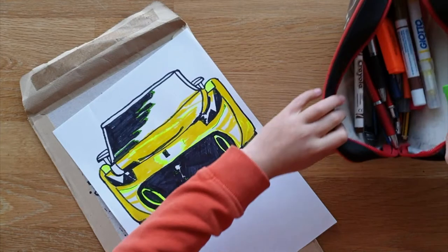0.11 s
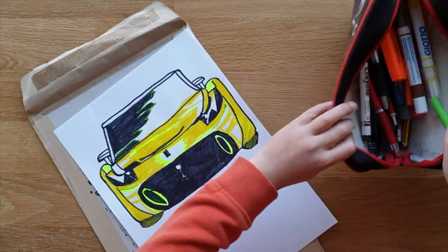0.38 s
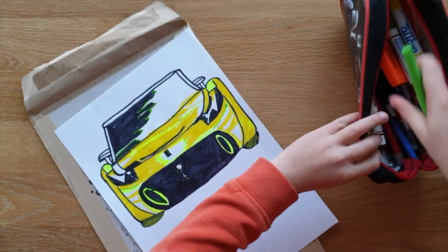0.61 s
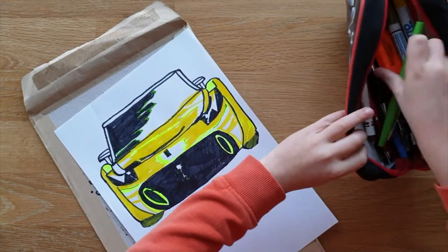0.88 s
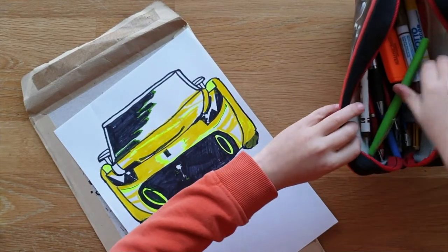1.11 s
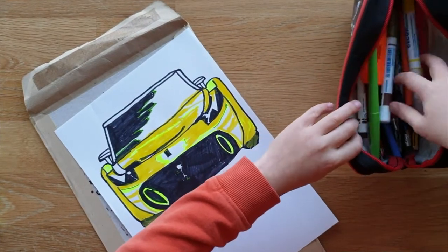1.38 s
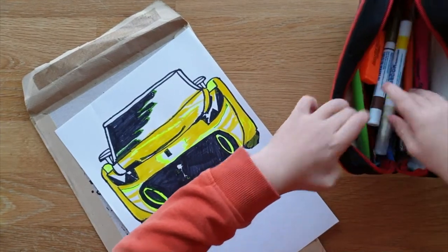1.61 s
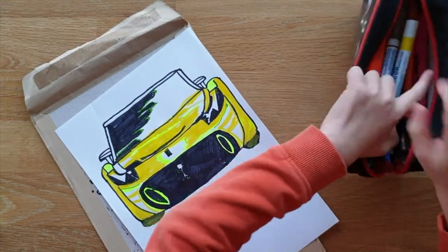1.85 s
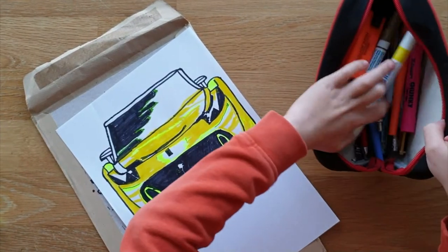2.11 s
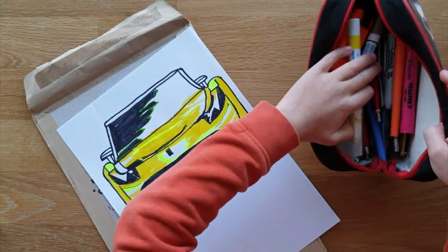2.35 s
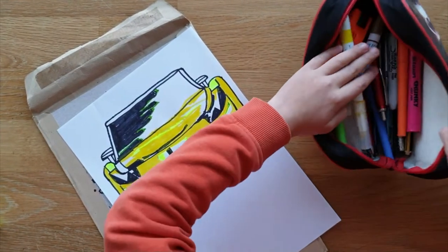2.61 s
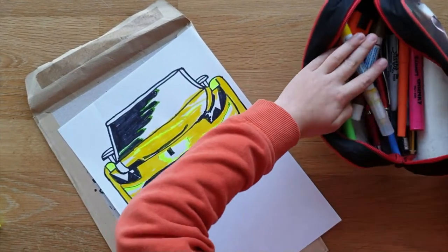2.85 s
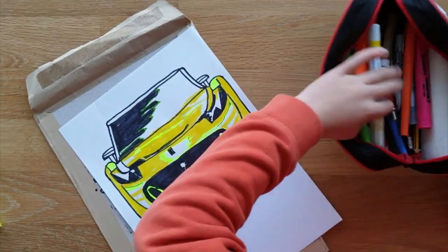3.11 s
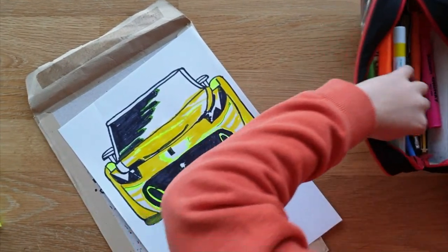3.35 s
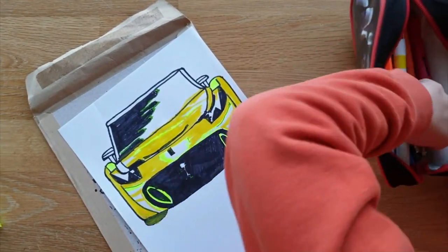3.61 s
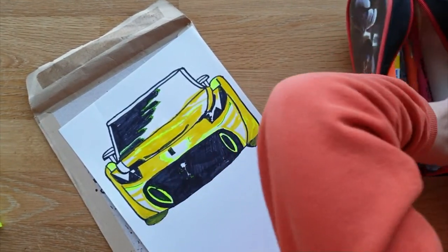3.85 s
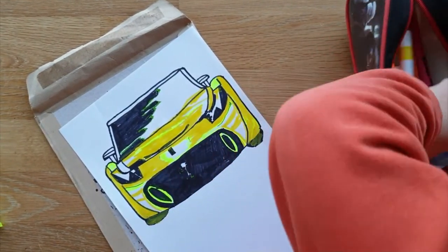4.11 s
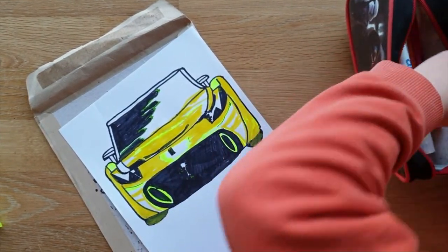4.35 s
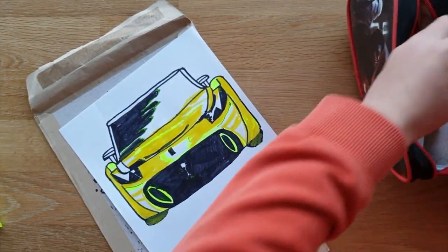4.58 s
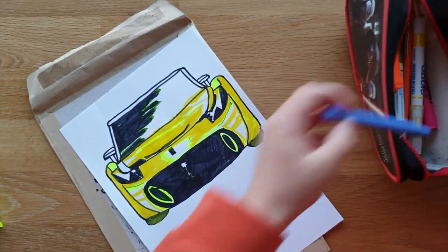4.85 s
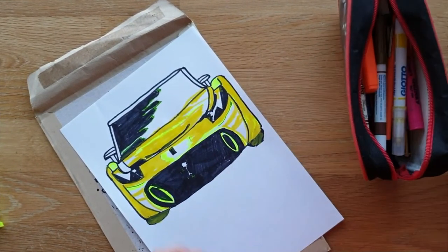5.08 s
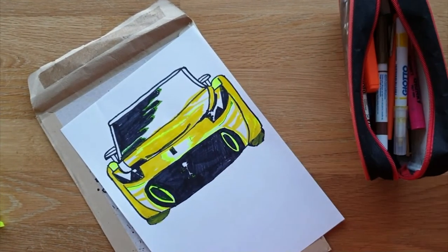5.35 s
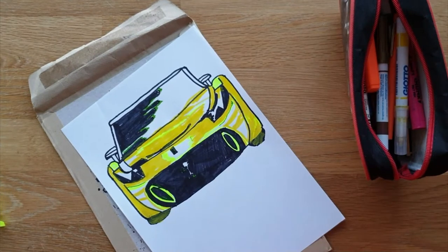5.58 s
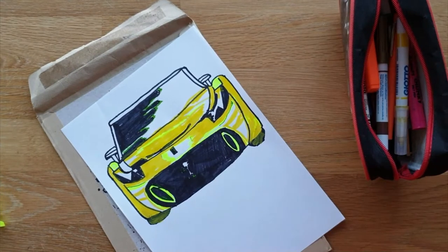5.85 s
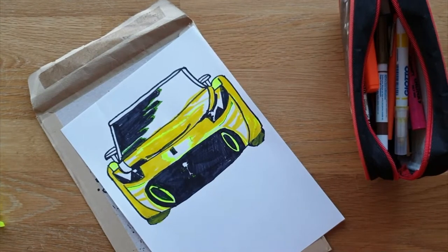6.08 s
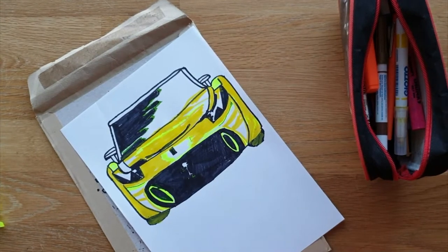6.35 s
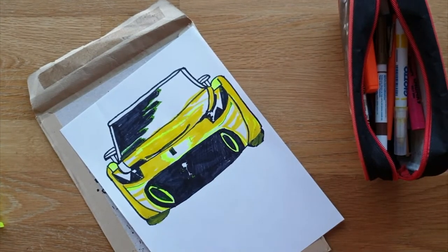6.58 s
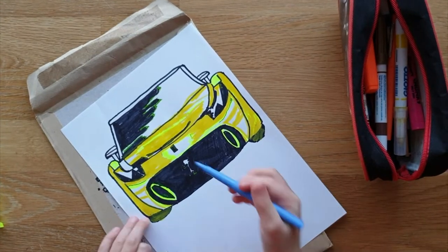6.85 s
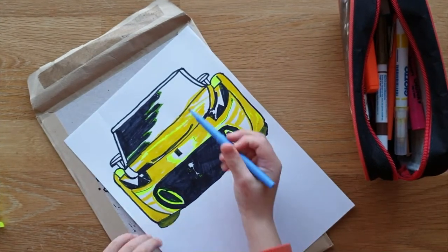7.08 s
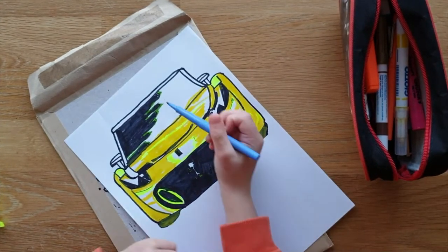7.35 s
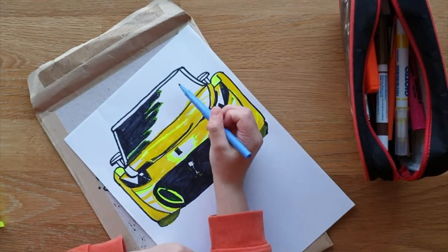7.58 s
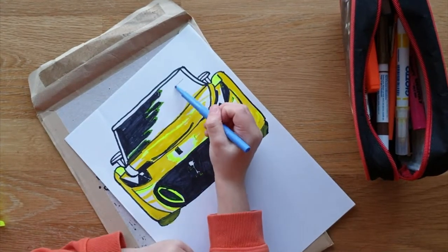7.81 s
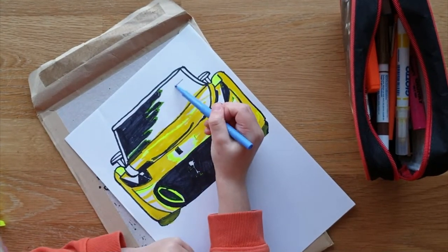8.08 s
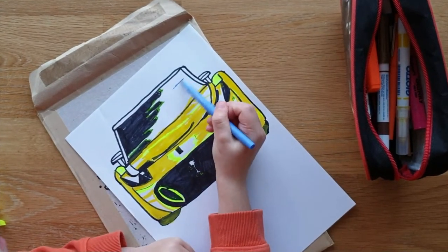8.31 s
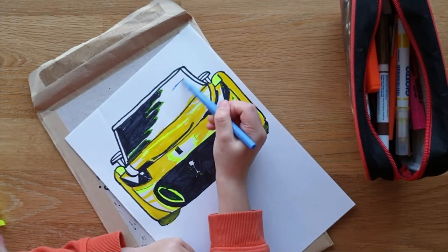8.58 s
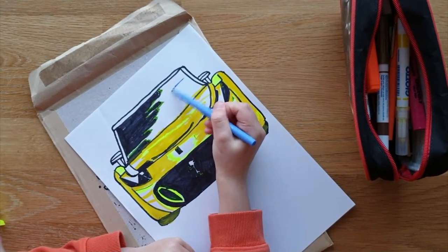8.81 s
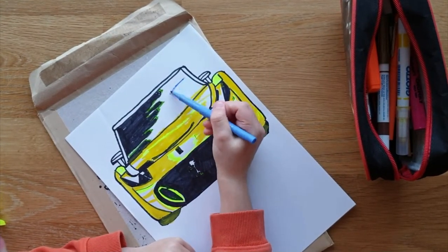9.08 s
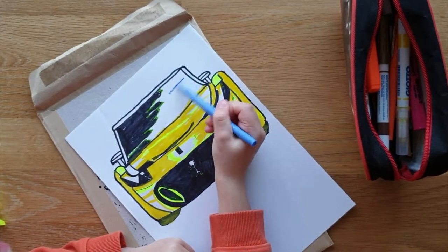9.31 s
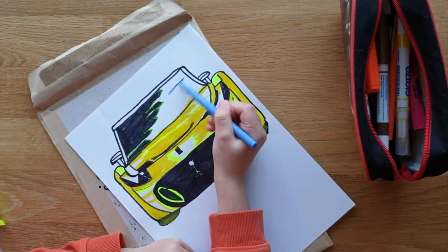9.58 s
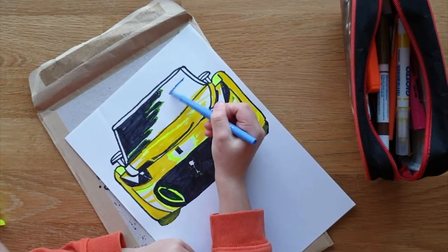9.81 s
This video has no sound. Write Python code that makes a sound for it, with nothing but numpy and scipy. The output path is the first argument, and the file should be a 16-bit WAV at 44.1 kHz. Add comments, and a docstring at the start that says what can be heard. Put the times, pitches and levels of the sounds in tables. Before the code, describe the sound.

A stereo pair close overhead hears sharp pen clacks and gritty cloth rustle from a pencil case, stronger on the left, with the table dragging and rumbling. The rummaging stops, a brief breathy cap slide drops in pitch, light plastic clicks and dull knocks follow, then soft thuds and steady, dry felt-tip scratching back and forth. A faint room hush lies beneath.

```python
"""Plastic pens clack as a hand rummages in a cloth case on a wooden table: noise cracks ring barrel modes.
Gritty noise makes the rustle of cloth and sleeve, the scrape of the table top and the felt tip's quick strokes.
A cap comes off as gliding narrow noise; thuds are low decaying sines, far knocks mostly room tail.
The table rumbles on its legs and a steady hush lies beneath; a bare room answers.
Two microphones a few centimetres apart listen from above, the left one louder and nearer the case."""
import sys
import numpy as np
from scipy import signal
from scipy.fft import rfft, irfft, next_fast_len
from scipy.io import wavfile
from scipy.ndimage import map_coordinates

SR = 44100
rng = np.random.default_rng(int(sys.argv[2]) if len(sys.argv) > 2 else 0)


def nominal_scale(level):
    """Amplitude ratio for a level in decibels (scalar or array-like)."""
    x = np.asarray(level, float) / 20
    return 10 ** x


def put_to_file(sound):
    """Save the sound as 16-bit audio at rate SR, in the file named by the first command-line argument."""
    columns = np.atleast_2d(sound).T  # one column per channel
    safe = np.clip(columns, -1, 1)
    whole_steps = np.round(safe * 32767)
    wavfile.write(sys.argv[1], SR, whole_steps.astype(np.int16))


N = 438340

# pen against pen: (time [s], relative level [dB], knock [dB], treble [dB], favoured pitch [Hz])
CLACKS = [(0.0054, -32, -6, -15, 1920), (0.061, -41, -14, -12, 5320), (0.0707, -33.5, -9, 7.5, 2050),
          (0.5156, -38.5, -30, 4.5, 9700), (0.6493, -42.5, -4, -11, 2350), (0.7096, -9.5, -14, 6, 6630),
          (0.7242, -16.5, -12, -19, 6890), (0.7435, -17.5, -8.5, -7, 6610), (0.8835, -29, -29, 2, 7040),
          (0.9552, -19.5, -10, -11, 1404), (1.0092, -43, -17, -8, 1860), (1.044, -31, -25, -3, 7350),
          (1.051, -28, -11, -15, 4680), (1.1179, -28, -11, -8, 4900), (1.2046, -24.5, -8, -1, 7030),
          (1.219, -14, -18, -11, 5140), (1.242, -21.5, -6, 4.5, 4540), (1.31, -30.5, -23, -1, 6600),
          (1.3284, -29, -9, 1.5, 6620), (1.413, -31.5, -13, -20, 1380), (1.4271, -24, -8, -5, 1720),
          (1.5034, -20, -8, -0.5, 6800), (1.7956, -25.5, -10, -11, 5130), (1.871, -28, -9, 0, 4110),
          (1.9057, -33, 4, -14, 2580), (1.919, -23.5, -5, -9, 1710), (1.938, -15.5, -8.5, -1, 3760),
          (2.032, -27.5, -23, 2, 6650), (2.0684, -29, -17, -3, 7170), (2.116, -8, -19, -2, 6800),
          (2.189, -27, -10, -1, 6300), (2.1919, -21, -7, -4, 7150), (2.2224, -28.5, -2, -2, 4620),
          (2.2326, -18.5, -18, -1, 6760), (2.243, -18, -4.5, -23, 7010), (2.3094, -14.5, -14, -15, 4200),
          (3.0878, -26, -7, -4, 6867), (3.105, -25.5, -11, -17, 3330), (3.4498, -31.5, -1, 1.5, 6700),
          (3.59, -30.5, -4, -5, 2230), (3.679, -36.5, 4, -10, 1030), (3.7239, -7.5, -14.5, -6.5, 3240),
          (4.056, -34, -5, -8, 6900), (4.085, -36, -2, 5.5, 6200), (4.139, -20.5, -31, -4, 6690),
          (4.145, -26, -12, -13, 4080), (4.2914, -19, -14, -6.5, 6020), (4.449, -20, -7, -3, 2190),
          (4.4726, -17.5, -8.5, -7, 2130), (4.5007, -18, -5.5, 0, 7160), (6.217, -52, -5, -5, 1570),
          (6.2688, -31, -15, 0.5, 7230), (6.2938, -27.5, -10, -4.5, 2200), (6.3204, -43, -16, -15, 6750),
          (6.3327, -35, -5, 4.5, 1580), (7.525, -34.5, -6, -29, 1590)]
# hand, case and arm: (time [s], hold [s], relative rustle [dB], crispness re rustle [dB], relative scrape [dB])
MOVES = [(0.0, 0.0093, -47.5, -3.5, -53), (0.439, 0.05, -54, -5, -65), (.67, .03, -57.5, -7, -60),
         (0.908, 0.37, -56, 3, -60), (1.264, 0.038, -50, -6, -50), (1.498, 0.14, -48.5, -15, -56),
         (1.834, 0.19, -47, -8, -63), (1.97, 0.045, -44.5, 2.5, -49.5), (2.202, 0.074, -58, 1, -48.5),
         (2.504, .45, -54, -11.5, -66), (3.086, 0.24, -47, -12.5, -46), (3.366, 0.4, -50, -7, -51.5),
         (3.771, 0.099, -45, -4, -60), (4.121, 0.13, -46, -10, -59), (4.517, 0.016, -44.5, 1, -48),
         (4.862, .2, -48, -12.5, -49.5), (5.387, 0.095, -61.5, -7, -74), (5.731, 0.076, -54, -9.5, -74),
         (6.335, 0.032, -51.5, -9, -84), (6.671, 0.14, -48.5, -9.5, -53), (6.898, 0.14, -58.5, -1, -60),
         (7.097, 0.091, -50.5, -11, -51), (7.341, 0.073, -55.5, -27, -54), (7.546, 0.15, -55, -22, -61.5),
         (7.786, 0.041, -46, -6, -53), (7.978, 0.13, -52.5, -13, -56), (8.188, 0.047, -53, -9, -54),
         (8.398, 0.19, -62.5, -3, -68), (8.797, 0.035, -67, -7, -62.5), (9.001, 0.056, -70.5, 0, -62.5),
         (9.84, .1, -57.5, -2.5, -58.5)]
# strength at rest: (rustle [dB], crisp rustle [dB], scrape [dB], rumble [dB]), all relative
RESTING_DB = -72.5, -85.5, -72.5, -76.5
LAG_SAMPLES = 10  # right microphone hears the case later


def unit(x):
    """Scales to rms 1."""
    return x / np.sqrt(np.mean(x ** 2) + 1e-20)


def along(points, hz):
    """Interpolates (Hz, value) points on a log axis."""
    f, v = np.transpose(points)
    return np.interp(np.log(hz + 1), np.log(f + 1), v)


def curves(rows):
    """One value per sample for each column after the time."""
    s, *columns = np.transpose(rows)
    return [np.interp(np.arange(N) / SR, s, column) for column in columns]


def wobble(knots_per_s):
    """Smooth random curve through normal knots."""
    knots = rng.standard_normal(int(N * knots_per_s / SR) + 4)
    return map_coordinates(knots, [np.arange(N) * knots_per_s / SR])


def filtered(x, response):
    """Multiplies the spectrum of x by a function of frequency."""
    size = next_fast_len(x.shape[-1] + 8192)
    spectrum = rfft(x, size) * response(np.fft.rfftfreq(size, 1 / SR))
    return irfft(spectrum, size)[..., :x.shape[-1]]


def coloured(x, spectrum):
    """Shapes x by (Hz, dB) points, rms 1."""
    return unit(filtered(x, lambda hz: nominal_scale(along(spectrum, hz))))


def resonant(x, peaks):
    """Parallel resonances (Hz, width Hz, dB) of alternating sign, rms 1."""
    def response(f):
        total = 0
        for k, (centre, width, db) in enumerate(peaks):
            damping = 1j * f * width
            total = total + (-1) ** k * nominal_scale(db) * damping / (centre * centre - f * f + damping)
        return total
    return unit(filtered(x, response))


def gritty(knots_per_s, grit_db):
    """Friction noise whose strength wanders at random."""
    return rng.standard_normal(N) * nominal_scale(grit_db * wobble(knots_per_s))


def diffuse(n):
    """Two noises, alike in the bass and unrelated in the treble."""
    # (frequency [Hz], left-right correlation [1])
    alike = [(60, 1), (300, 0.37), (650, 0), (1400, 0), (15000, 0)]

    def angle(hz):
        return np.arccos(np.clip(along(alike, hz), -1, 1)) / 2

    noise = rng.standard_normal((2, n))
    mid, side = filtered(noise, lambda hz: np.array([np.cos(angle(hz)), np.sin(angle(hz))]))
    return np.array([mid + side, mid - side])


def heard(x, direct_pan_db, wet_db, lag_samples):
    """Direct sound, first echoes and a tail in which each frequency dies at its own speed."""
    # (frequency [Hz], t60 [s])
    decay = [(300, 0.2), (2000, 0.59), (6000, 0.41), (15000, 0.2)]
    # first echoes: (delay [s], relative level [dB])
    walls = [(.0065, -14), (0.0104, -8.5), (0.0183, -14.5)]
    n = SR // 2
    hz, t, z = signal.stft(diffuse(n), SR, nperseg=256)
    fading = z * nominal_scale(-60 * t / along(decay, hz)[:, None])
    tail = signal.istft(fading, SR, nperseg=256)[1][:, :n]
    onset = 1 - np.exp(-np.arange(n) / SR / 0.00074)
    answer = nominal_scale(wet_db) * tail / np.linalg.norm(tail[0]) * onset
    for s, db in walls:
        answer[[0, 1], round(s * SR) + rng.integers(0, 12, 2)] += nominal_scale(db)
    answer[0, 0] += nominal_scale(direct_pan_db / 2)
    answer[1, lag_samples] += nominal_scale(-direct_pan_db / 2)
    return signal.fftconvolve(x[None], answer * nominal_scale([[2], [-2]]), axes=1)  # left 4 dB up, room included


def heard_long(x, *place, size=8192):
    """A lasting sound in overlapping pieces, each with a freshly drawn answer, so no fixed stripes build up."""
    out, fade = np.zeros((2, N + SR + 2 * size)), np.hanning(size)
    x = np.pad(x, size)
    for i in range(0, N + size, size // 2):
        sound = heard(x[i:i + size] * fade, *place)
        out[:, i:i + sound.shape[1]] += sound
    return out[:, size:size + N]


def swells(s, hold_s, db, rise_db_per_s, fall_db_per_s, rest_db):
    """Strength per sample of events with steady dB slopes, power-summed over a resting level."""
    t = np.arange(0, N + 128, 128)[:, None] / SR
    rise_loss = rise_db_per_s * np.clip(s - t, 0, None)
    fall_loss = fall_db_per_s * np.clip(t - s - hold_s, 0, None)
    power = (nominal_scale(db - (rise_loss + fall_loss)) ** 2).sum(1) + nominal_scale(rest_db) ** 2
    return np.interp(np.arange(N) / SR, t[:, 0], np.sqrt(power))


def settling(share_db):
    """Loose pens shuffle on briefly after each clack, more after a loud one."""
    s, clack_db = np.transpose(CLACKS)[:2]
    return swells(s, 0, -35.5 + 0.5 * clack_db + share_db, 1500, 187, -120)


def moving(db, rest_db):
    """Strength of one layer under the movements."""
    s, hold_s = np.transpose(MOVES)[:2]
    return swells(s, hold_s, db, 167, 136, rest_db)


def rummage():
    """Cloth, skin and loose pens rub in small slips; the harder the rubbing, the grittier."""
    # cloth rustle: (frequency [Hz], relative level [dB])
    cloth = [(530, -13.5), (900, -1), (961, -10.5), (1030, -3.5), (2060, -0.5), (2240, -1), (3430, -8),
             (7090, -7), (8300, -19), (10800, -30), (18300, -120)]
    # crisp rustle: (frequency [Hz], relative level [dB])
    crisp_colour = [(4880, -15), (8300, -17.5), (11100, -6.5), (13900, -13.5), (15800, -7.5)]
    rustle_db, crisp_db = np.transpose(MOVES)[2:4]
    rustle = np.hypot(moving(rustle_db, RESTING_DB[0]), settling(0))
    crisp = np.hypot(moving(rustle_db + crisp_db, RESTING_DB[1]), settling(1))
    grit_db = np.clip((20 * np.log10(rustle) + 68) / 7, 0, 4)
    slips = gritty(250, grit_db)
    return rustle * coloured(slips, cloth) + crisp * coloured(slips, crisp_colour)


def table():
    """Dragging excites the top's resonances; heavy drags favour its main mode."""
    # table top resonances: (centre [Hz], width [Hz], relative level [dB])
    top = [(210, 30, -9), (333, 58, -8.5), (417.3, 24.8, 0.5), (610, 79, -5), (713, 59, -2.5),
           (914, 260, -10.5)]
    scrape = np.hypot(moving(np.transpose(MOVES)[4], RESTING_DB[2]), settling(-14))
    heaviness = (scrape / nominal_scale(-43.5)) ** 0.66
    drag = resonant(gritty(40, grit_db=1.0), top)
    main_mode = resonant(gritty(40, grit_db=2.0), [(414.5, 62, 0)])
    return scrape * (drag + heaviness * main_mode)


def legs():
    """Shoves and drags rock the table on its legs: low resonances, 3 dB stronger on the right."""
    # shoves: (time [s], relative level [dB])
    shoves = [(.4, -64), (1.27, -51.5), (1.52, -65), (2.27, -60), (3.2, -63), (3.87, -64), (4.49, -53.5),
              (4.869, -65), (5.402, -58), (6.97, -59.5), (7.64, -47), (7.97, -62)]
    # leg resonances: (centre [Hz], width [Hz], relative level [dB])
    leg_modes = [(49.3, 3.8, 0.3), (84.6, 12, -2.08), (124, 25, -0.98)]
    s, db = np.transpose(shoves)
    rocking = swells(s, 0.013, db, 204, 133, RESTING_DB[3])
    dragging = np.hypot(moving(np.transpose(MOVES)[4] - 31, -120), settling(-29))
    shake = filtered(diffuse(N), lambda f: 1 / (1 + (f / 160) ** 4))
    return np.hypot(rocking, dragging) * resonant(shake, leg_modes) * nominal_scale([[-1.5], [1.5]])


def hush():
    """Steady diffuse noise of the room, 3 dB stronger on the left."""
    # (frequency [Hz], relative level [dB])
    hush_colour = [(30, -7.5), (55, -8), (86, 1.5), (170, -15.5), (310, -6), (700, -8), (1200, -13),
                   (3500, -39), (6800, -9.5), (8400, -30), (13000, -27), (15800, -19.5)]
    return nominal_scale(-64) * coloured(diffuse(N), hush_colour) * nominal_scale([[1.5], [-1.5]])


def clacks():
    """Each contact is a push and broad crack ringing the barrel modes, most those near its own pitch."""
    # hollow pen barrels: (nominal frequency [Hz], relative level [dB], t60 [s])
    barrel = [(1380, 0, .012), (1700, 0, .012), (2200, -2, .007), (2700, -3, .005), (3300, -3, .004),
              (4200, -2, .004), (5100, -2, .004), (6000, -2, .004), (7000, 0, .005), (11000, 0, .003),
              (13200, 0, .003)]
    out, t = np.zeros((2, N + SR)), np.arange(1024) / SR
    hz, level_db, t60_s = np.transpose(barrel)[:, :, None]
    for s, db, knock_db, treble_db, note_hz in CLACKS:
        colour = [(400, -42), (1100, knock_db), (1900, knock_db), (3800, -3.0), (7600, 1.0),
                  (8600, treble_db), (15000, treble_db)]
        near_db = 5 * np.exp(-(np.log(hz / note_hz) / 0.19) ** 2)
        # every mode varies at random in strength, pitch and phase from clack to clack
        strength, detune, phase = rng.standard_normal((3, len(hz), 1))
        decay = nominal_scale(level_db + near_db + 2 * strength - 60 * t / t60_s)
        ring = (decay * np.sin(2 * np.pi * hz * (1 + 0.043 * detune) * t + phase)).sum(0)
        crack = nominal_scale(-60 * t / 0.0085) * rng.standard_normal(len(t))
        push = 5.4 * (t == 0)
        blow = np.pad(ring + crack + push, (128, 0))
        blow = filtered(blow, lambda f: nominal_scale(db - 6.0 + along(colour, f)))
        wet_db = -1 - 0.11 * db  # soft clacks lie deeper in the case, so wetter
        sound = heard(blow, 8.2, wet_db, LAG_SAMPLES)
        out[:, max(round(s * SR) - 128, 0):][:, :sound.shape[1]] += sound
    return out[:, :N]


def far_knocks():
    """Short dull blows on plastic out of sight; the room tail outweighs the direct sound."""
    # (time [s], relative level [dB], direct re tail [dB], treble tilt above 3 kHz [dB/octave, relative],
    #  hollow note [dB, relative])
    knocks = [(0.415, -35, -14, -1, -30), (5.532, -32, -15, -12, -34), (6.098, -28, -16.5, -10, -14),
              (7.4927, -29.5, -5, -9, -16), (7.7232, -20, -7, -4, -19), (9.7022, -30, -8, -1, -31)]
    out, t = np.zeros((2, N + SR)), np.arange(4096) / SR
    for s, db, direct_db, tilt_db, note_db in knocks:
        colour = [(700, -26.0), (1300, 0), (1600, 5), (2000, 9.5), (3000, 5.0),
                  (6000, tilt_db + 4), (12000, 2 * tilt_db - 13)]
        note = nominal_scale(note_db - 60 * t / 0.075) * np.sin(2 * np.pi * 1602 * t)
        crack = 0.64 * nominal_scale(-60 * t / 0.01) * rng.standard_normal(len(t))
        push = 5 * (t == 0)
        blow = np.pad(note + push + crack, (128, 0))
        blow = filtered(blow, lambda f: nominal_scale(db + direct_db + along(colour, f)))
        sound = heard(blow, 0, -direct_db, LAG_SAMPLES)
        out[:, round(s * SR) - 128:][:, :sound.shape[1]] += sound
    return out[:, :N]


def cap():
    """The cap slides off: friction noise in a narrow air resonance that drops in pitch."""
    # (time [s], air resonance [Hz], relative level [dB])
    glide = [(5.58, 1280, -78), (5.62, 1260, -58), (5.66, 1180, -54), (5.72, 980, -54.5), (5.79, 820, -61),
             (5.88, 750, -85)]
    hz, db = curves(glide)
    flutter = np.array([wobble(400), wobble(400)])
    phase = 2 * np.pi * np.cumsum(hz) / SR
    return nominal_scale(db) * (flutter[0] * np.cos(phase) + flutter[1] * np.sin(phase))


def thuds():
    """Wrist and cap set down: each soft blow rings one table mode."""
    # (time [s], relative level [dB], mode [Hz], t60 [s], left re right [dB])
    blows = [(5.973, -44, 133, 0.071, 4), (7.542, -41.5, 74, 0.23, -5), (7.62, -32.5, 55.8, 0.3, -9),
             (7.79, -46.5, 396, 0.36, 6), (8.178, -46, 605, 0.17, 6)]
    out = np.zeros((2, N))
    for s, db, hz, t60_s, pan_db in blows:
        t = np.clip(np.arange(N) / SR - s, 0, None)
        onset = 1 - np.exp(-t / 0.0037)
        ring = nominal_scale(db - 60 * t / t60_s) * np.sin(2 * np.pi * hz * t) * onset
        out += ring * nominal_scale([[pan_db / 2], [-pan_db / 2]])
    return out


def felt_tip():
    """The tip hisses while it moves and falls silent as it turns; the return presses harder."""
    # tip on paper: (frequency [Hz], relative level [dB])
    felt = [(1410, -19), (2400, -9), (3240, -6.5), (3420, -4), (3880, -8), (4270, -10.5), (5760, -7.5),
            (7300, -1.5), (7530, -2), (8680, -10), (10100, -6), (11700, -3.5), (12700, -4), (13600, -2.5),
            (15800, -12)]
    # (time [s], relative level [dB])
    pressure = [(7.89, -57.5), (8.1, -57.5), (8.35, -52), (8.6, -51.5), (9.1, -49), (9.45, -52), (9.7, -51),
                (9.9, -50)]
    first_stroke_s, period_s, turn_s = 7.892, 0.2002, 0.092  # turn: from out to back
    stroke_s, back_db = 0.057, 1.5
    t, speed = np.arange(N) / SR, np.zeros(N)
    for out_s in np.arange(first_stroke_s, N / SR, period_s):
        for s, db in (out_s, 0), (out_s + turn_s, back_db):
            start = 1 + np.exp(np.clip((s - t) / 0.0043, -50, 50))
            stop = 1 + np.exp(np.clip((t - s - stroke_s) / 0.0095, -50, 50))
            speed += nominal_scale(db) / start / stop
    return nominal_scale(5.0 + curves(pressure)[0]) * speed * coloured(gritty(120, grit_db=1.0), felt)


def scene():
    """All sources in the room over its hush; the hands leave the case for the paper at 5.2 s."""
    hands = rummage() + table() + cap()
    at_case = np.arange(N) / SR < 5.2
    near_case = heard_long(hands * at_case, 2.05, -0.11, LAG_SAMPLES)
    near_paper = heard_long(hands * ~at_case + felt_tip(), 1.6, 1.0, 0)
    near = nominal_scale(-2.5) * (near_case + near_paper)
    return near + clacks() + far_knocks() + thuds() + legs() + hush()


def band_limit(x):
    """A steep low-pass at the top of the band."""
    return signal.sosfilt(signal.butter(12, 16760, fs=SR, output="sos"), x)


def record(dry):
    """The microphones hiss faintly and lose the deepest bass and top treble."""
    hissing = dry + nominal_scale(-73) * rng.standard_normal(dry.shape)

    def response(hz):
        bass_cut = hz ** 4 / (hz ** 4 + 44 ** 4)
        return bass_cut / (1 + (hz / 15520) ** 60)

    return band_limit(filtered(hissing, response))


dry = scene()
out = record(dry)
put_to_file(out)
```